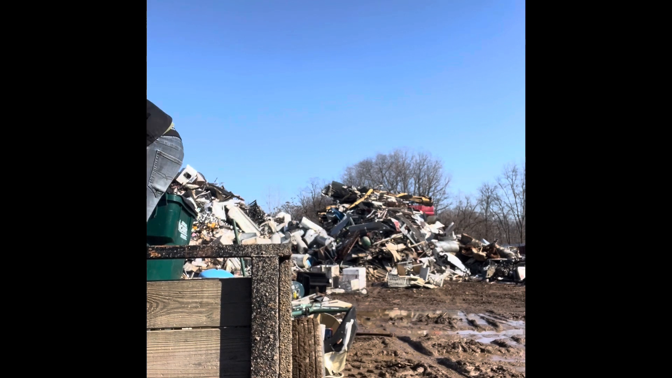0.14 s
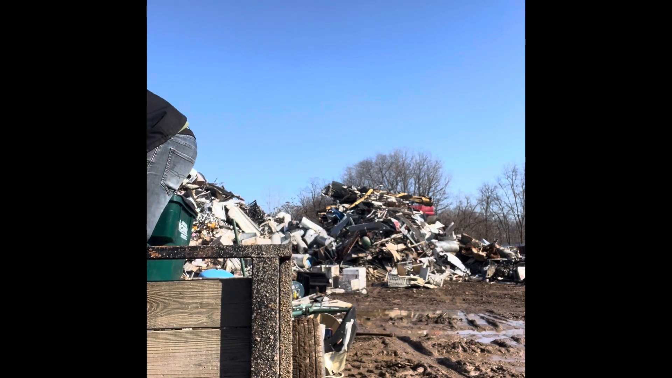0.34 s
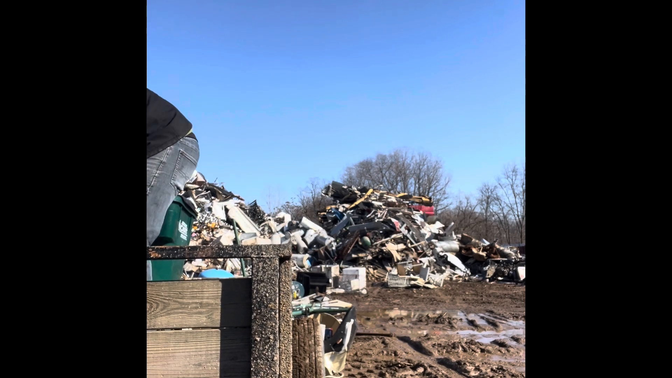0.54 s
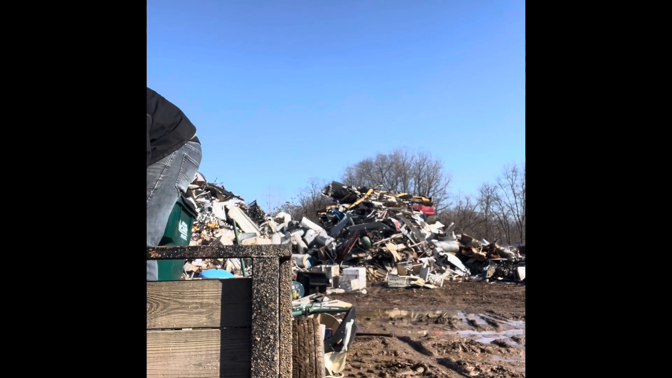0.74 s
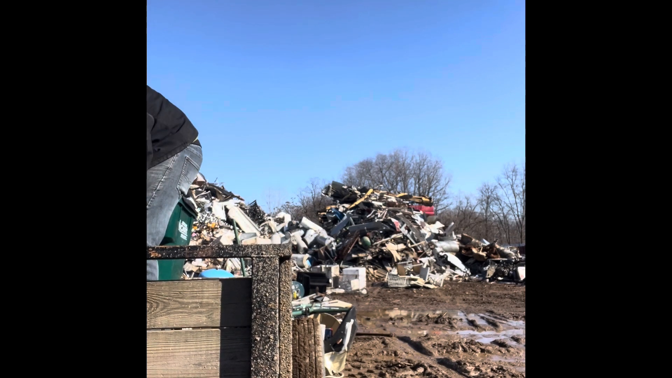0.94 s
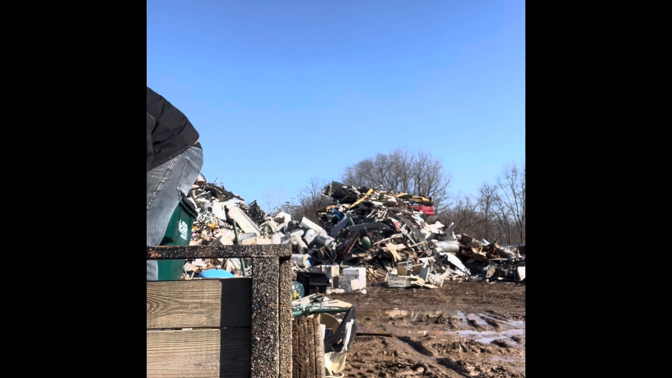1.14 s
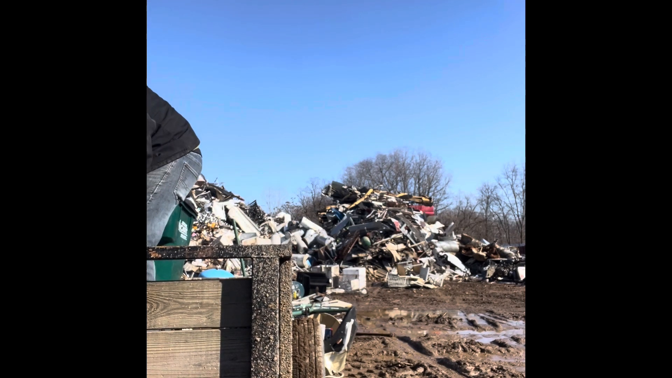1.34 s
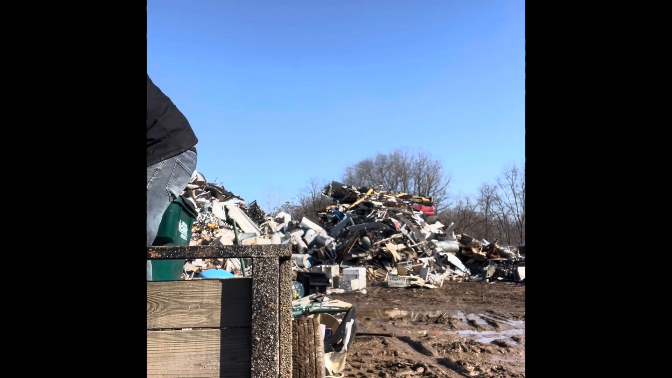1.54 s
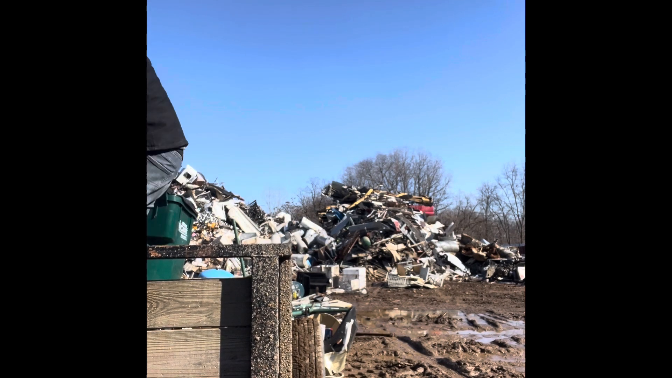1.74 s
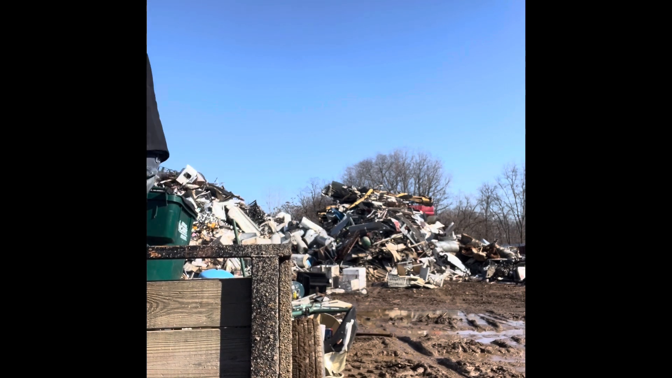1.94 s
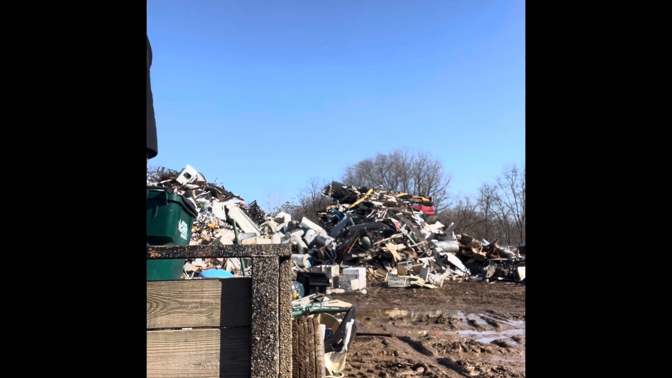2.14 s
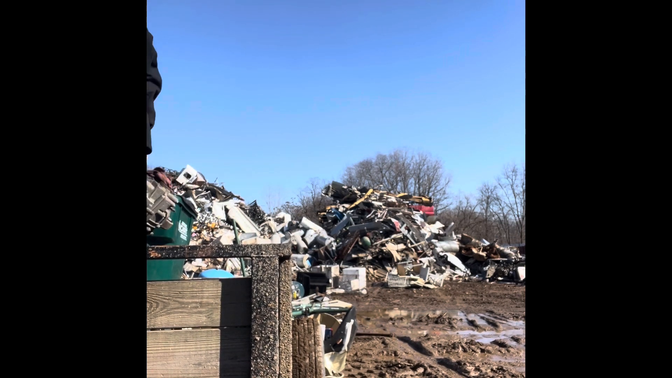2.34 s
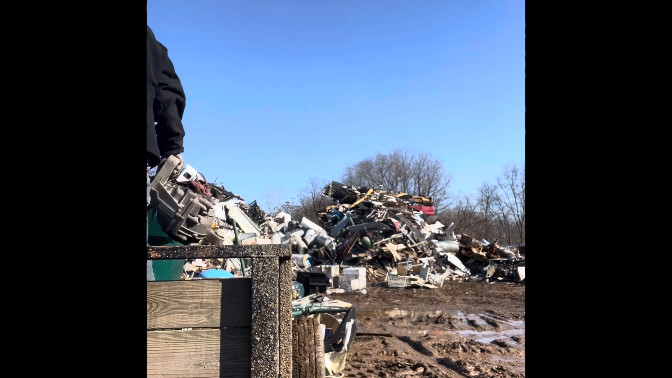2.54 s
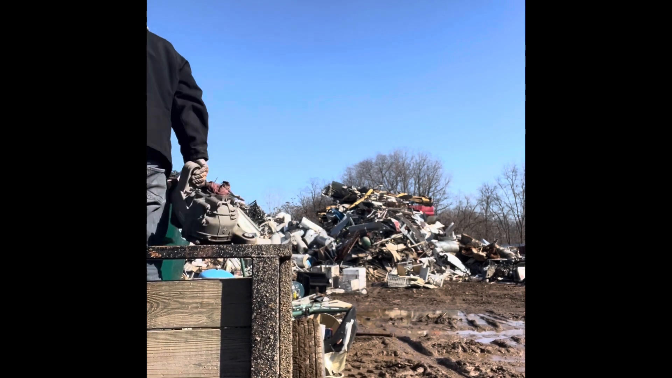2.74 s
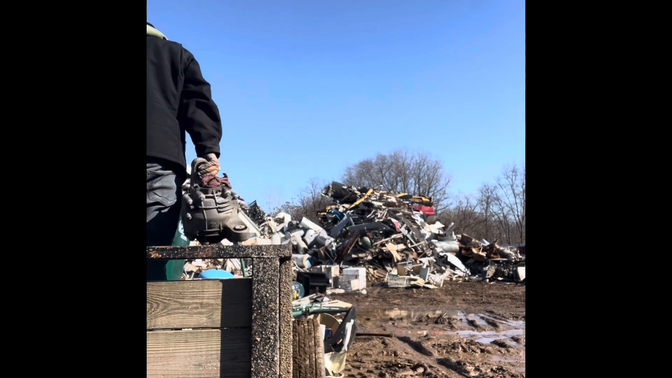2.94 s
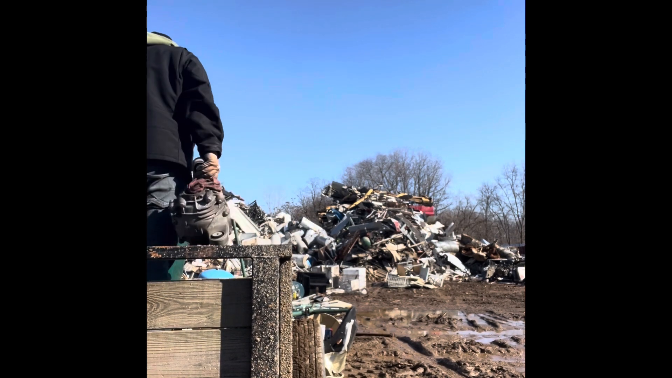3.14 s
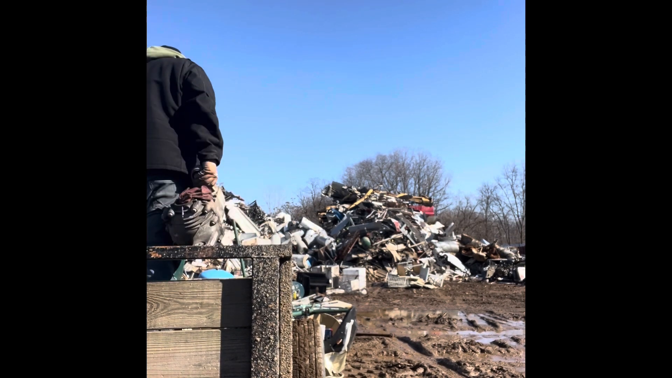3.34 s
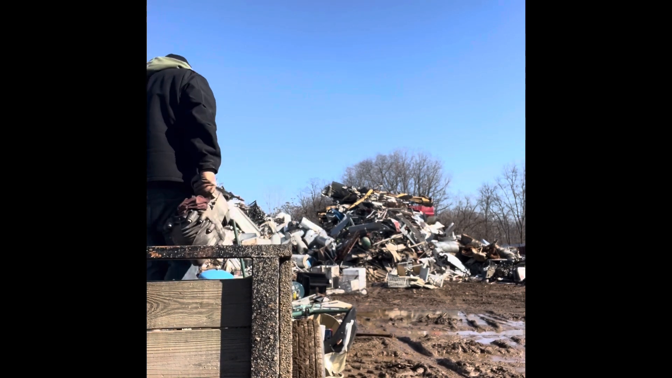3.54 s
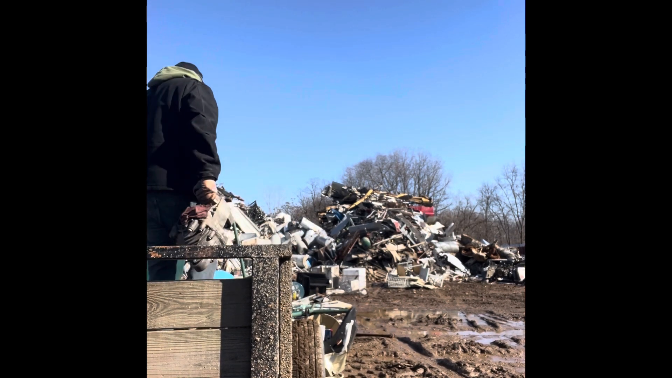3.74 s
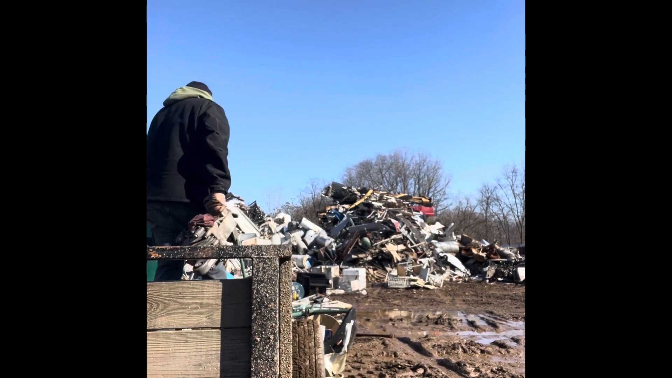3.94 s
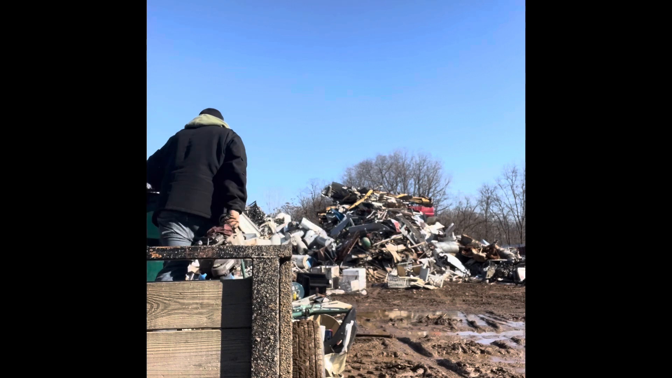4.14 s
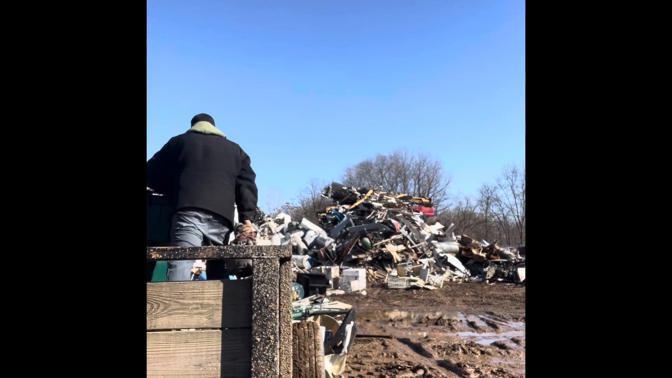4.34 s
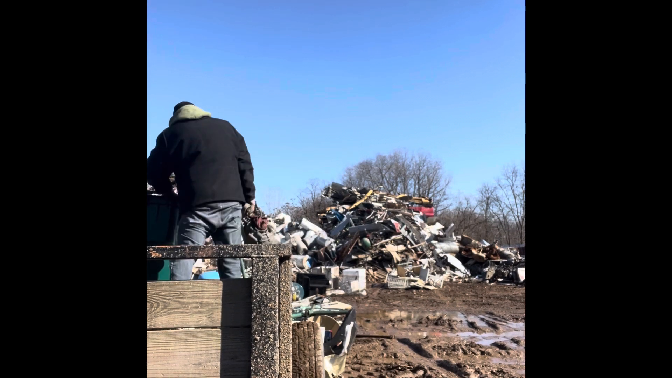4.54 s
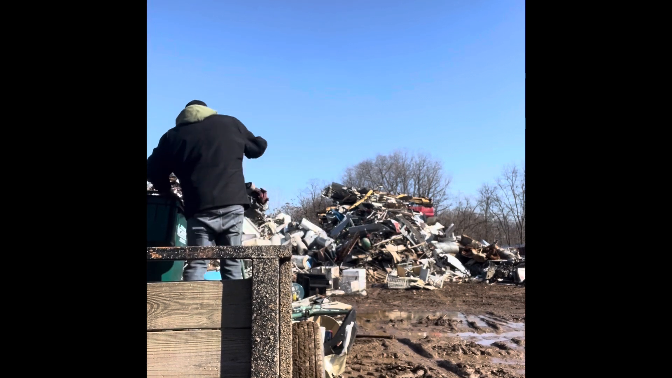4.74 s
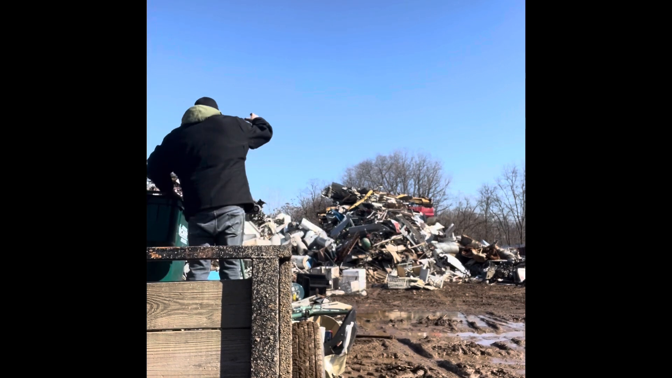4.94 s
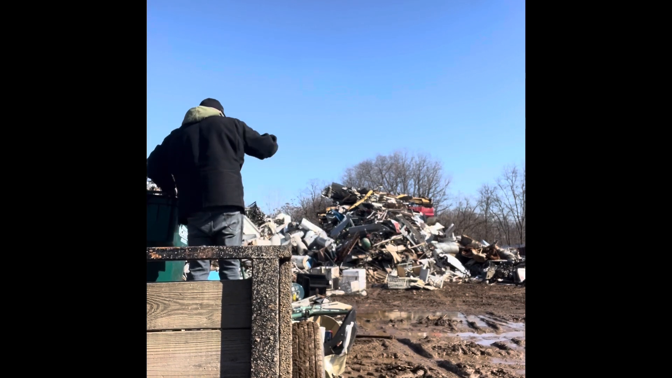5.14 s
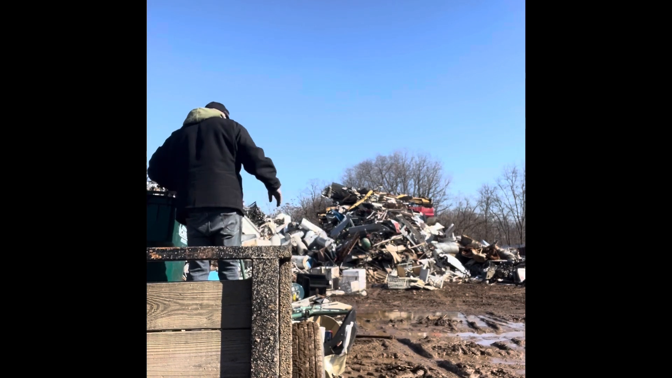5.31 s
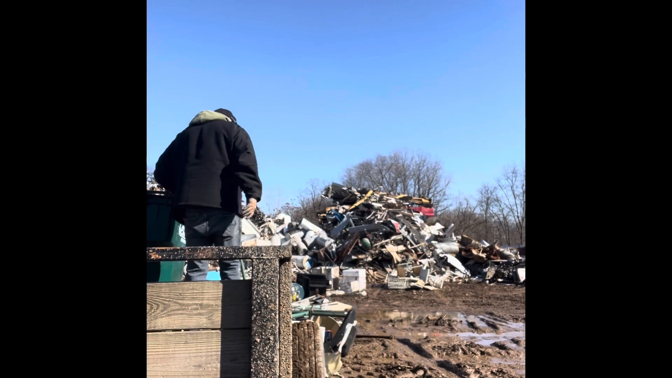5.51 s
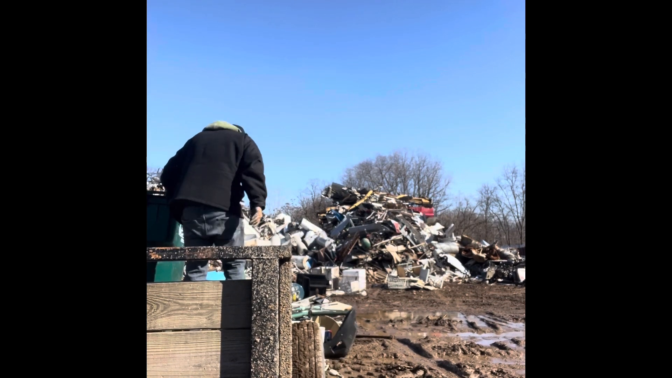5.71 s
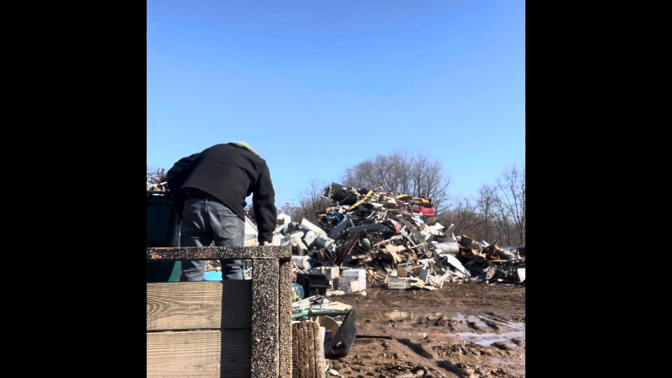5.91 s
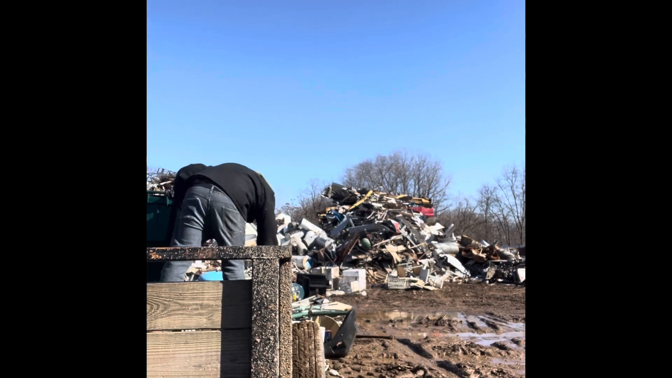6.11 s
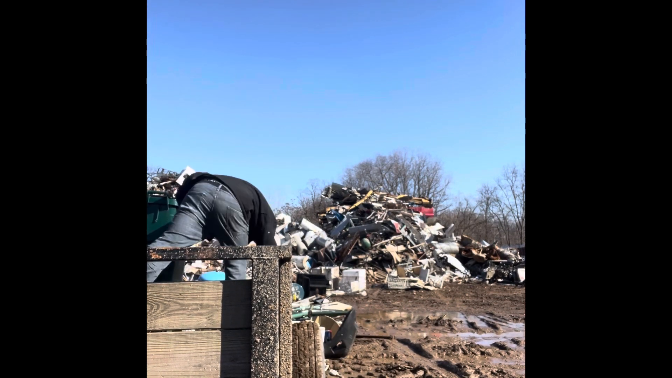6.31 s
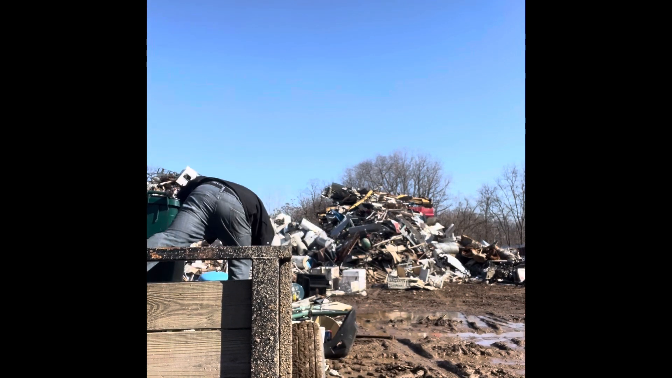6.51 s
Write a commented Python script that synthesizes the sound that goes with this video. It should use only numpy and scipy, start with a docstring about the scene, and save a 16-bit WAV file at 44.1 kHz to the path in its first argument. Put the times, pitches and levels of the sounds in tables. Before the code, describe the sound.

Quick, uneven puffs of hissing air sound over low wind rumble and faint distant machines at a scrap yard. Boots thud on a wooden-sided truck bed and a bin rings softly. A loud, sharp knock shakes the boards. Then a tossed piece of scrap crashes onto a heap of sheet metal, bouncing and sliding with a scraping clatter. A phone propped on the truck picks it all up.

```python
"""Quick, uneven puffs of hissing air are heard first, over wind rumble, far machines and a faint whine.
The place is a scrap yard, heard by a phone propped on a wooden-sided truck bed. Boots thud on the bed,
a bin rings and a loud knock cracks on the boards and sets the bed shuddering: each blow excites damped
modes. Then a tossed lump of scrap crashes, bounces and slides down a heap of sheet metal, whose
resonances are driven by dense impacts."""
import sys
import numpy as np
from scipy import signal
from scipy.fft import rfft, irfft
from scipy.io import wavfile
from scipy.ndimage import uniform_filter1d

SR = 44100
rng = np.random.default_rng(int(sys.argv[2]) if len(sys.argv) > 2 else 0)


def write(x):
    x = np.atleast_2d(x).T
    wavfile.write(sys.argv[1], SR, np.round(np.clip(x, -1, 1) * 32767).astype(np.int16))


N = 294147
T = np.arange(N) / SR
HZ = np.fft.rfftfreq(N, 1 / SR)
OPPOSITE = np.array([[1], [-1]])  # antiphase at the two microphone ports

# low rumble and buffeting: wind, plus the truck bed shuddering after the loud knock (near 4.5 s):
# (time [s], rumble level [dB], buffeting or shudder level [dB])
LOW_NOISE_LEVELS = [(0, -45, -53), (.8, -43.5, -48), (1.08, -43, -58.5), (1.4, -47, -54), (1.86, -45, -50),
                    (2.17, -47, -47.5), (2.4, -51, -57.5), (2.88, -47.5, -52.5), (3.6, -49, -60),
                    (4.12, -46.5, -55.5), (4.39, -44.5, -49.5), (4.48, -36, -34), (4.75, -45, -57.5),
                    (4.95, -41.5, -73), (5.15, -44.5, -56.5), (5.7, -41, -36), (6.2, -46.5, -39),
                    (6.42, -37.5, -39), (6.67, -37, -38.5)]
# spectra of the three parts of that low noise: (frequency [Hz], relative density [dB])
RUMBLE_SPECTRUM = [(22, -24), (35, -8.5), (50, -3.5), (75, 1), (110, -4.5), (160, -9), (250, -31)]
BUFFET_SPECTRUM = [(80, -33.5), (130, -4.5), (200, -3), (320, -2), (450, -16), (700, -67)]
RUSH_SPECTRUM = [(250, -26), (380, 3), (500, -8), (700, -5), (900, -1.5), (1200, -74)]
# far machines: (frequency [Hz], relative density [dB])
MACHINE_SPECTRUM = [(300, -14), (500, -3.5), (750, 4.5), (1050, -4), (1400, 0), (2000, -10), (2600, -2),
                    (3300, -19.5), (4500, -21.5), (7000, -32.5), (10800, -35.5), (11500, -65)]
# their rise and fall: (time [s], relative level [dB])
MACHINE_LEVELS = [(0, -50), (.9, -53.5), (1.3, -53), (1.9, -50.5), (3, -54), (3.8, -52), (4.2, -49),
                  (4.45, -43.5), (4.7, -41), (4.9, -51.5), (5.3, -49.5), (6.3, -57.5), (6.67, -49)]
# short bursts of hiss: puffs of air, and two sharp cracks on the loud knock (4.434 and 4.45 s):
# (start [s], length [s], level [dB])
HISS_BURSTS = [(.004, .044, -43), (.062, 0.017, -55), (0.152, 0.053, -51.5), (0.224, 0.054, -44),
               (0.29, 0.068, -48), (0.38, 0.048, -49.5), (0.438, .036, -58.5), (0.482, 0.046, -46.5),
               (0.548, 0.044, -42), (.615, .041, -64), (0.644, 0.074, -41.5), (0.758, 0.055, -42.5),
               (0.839, 0.058, -44.5), (0.95, 0.064, -52.5), (1.042, 0.045, -54), (1.193, .03, -57),
               (1.252, 0.024, -73), (1.305, .025, -64), (1.352, .043, -50.5), (1.422, 0.055, -52),
               (1.513, 0.06, -53), (1.604, .046, -54.5), (1.671, 0.031, -54), (1.73, 0.057, -48.5),
               (1.812, 0.063, -45), (1.911, .067, -50.5), (2.02, 0.045, -48), (2.089, .059, -47),
               (2.176, 0.045, -46.5), (2.28, 0.09, -57), (2.397, 0.057, -48.5), (2.486, 0.06, -58.5),
               (2.593, 0.053, -52), (2.666, .048, -43.5), (2.74, 0.094, -47.5), (2.88, 0.07, -42.5),
               (2.999, 0.064, -42), (3.094, 0.069, -45.5), (3.199, 0.075, -49.5), (3.325, 0.057, -48),
               (3.401, 0.037, -43), (3.458, 0.042, -52.5), (3.514, 0.043, -57), (3.582, 0.045, -59),
               (3.627, 0.046, -60), (3.694, 0.042, -53.5), (3.85, 0.066, -56.5), (3.949, 0.044, -61),
               (4.066, .036, -60), (4.133, 0.046, -45.5), (4.233, 0.059, -44), (4.324, 0.039, -44.5),
               (4.381, 0.044, -47.5), (4.434, 0.0078, -33), (4.45, 0.0082, -35.5), (4.463, 0.014, -46),
               (4.51, .024, -33.5), (4.533, 0.029, -45), (4.583, 0.037, -38.5), (4.658, 0.035, -37),
               (4.706, 0.026, -37.5), (4.771, 0.043, -37), (4.832, 0.071, -49), (4.995, .022, -57.5),
               (5.049, .027, -50.5), (5.099, .033, -60.5), (5.171, 0.032, -55.5), (5.228, 0.071, -54.5),
               (6.07, 0.1, -61), (6.199, 0.081, -62.5), (6.393, 0.056, -55), (6.479, 0.053, -47),
               (6.605, 0.18, -57.5)]
# upper and lower parts of the hiss: (frequency [Hz], relative density [dB])
HISS_TREBLE_SPECTRUM = [(2000, -53), (2800, -1.5), (3600, -8), (4500, 1.5), (6000, 0.5), (7300, -7),
                        (8200, -5), (10800, -17.5), (11500, -23), (12300, -74), (13500, -21), (15800, -16)]
HISS_BODY_SPECTRUM = [(150, -11), (350, -18), (700, -2), (1050, -12), (1400, 6.5), (1750, -6), (2200, -13),
                      (2800, -21), (3600, -24)]
# blows on the bed: (time [s], peak [dB], pitch [Hz], contact [s], pan left [dB], hardness [dB/octave])
BED_BLOWS = [(0.546, -31.5, 115, 0.016, -3, 0.5), (0.815, -22, 237, 0.01, -1, 3),
             (1.335, -32.5, 125, 0.011, 3, -2), (2.694, -45, 150, 0.014, 0, -9),
             (4.299, -28, 90, 0.012, -3, -3.5), (4.42, -4.5, 254, 0.019, 4.5, 2.2),
             (4.432, -2, 258, 0.01, 1, 6.5), (4.448, -17, 221, 0.017, -2.5, -2.5),
             (4.616, -27.5, 164, 0.031, 4, 3.5), (4.938, -28.5, 122, 0.015, 5.5, -15),
             (5.113, -32, 199, 0.015, 3.5, -17)]
# modes of a board: (frequency / pitch [ratio], level [dB], T60 [s])
BOARD_MODES = [(.58, -16, 0.13), (0.999, 4.5, 0.034), (1.5, -5, 0.056), (1.83, 0, 0.031), (2.2, -5, 0.038),
               (2.6, -18.5, 0.065), (3.78, -15.5, 0.046)]
# modes of the bin and of a small piece of scrap: (frequency [Hz], level [dB], T60 [s])
BIN_MODES = [(267.9, 0.5, 0.48), (258.5, -1.5, 0.19), (294.4, -2, 0.14), (189, -12, 0.25)]
PIECE_MODES = [(667, 5.5, 0.028), (842, 6, 0.021), (1176, -0.5, 0.019), (1520, -22, 0.011),
               (1850, -0.5, 0.015), (2312, 2, 0.036), (2640, -6, 0.033), (3530, -2, 0.011), (4530, 0, .008),
               (6000, -5, .007), (7700, -11, 0.0052)]
# small pieces scraping: (time [s], peak [dB], pan left [dB], grit decay [s], excitation centre [Hz])
SCRAP_TICKS = [(.227, -36.5, 11, 0.0066, 900), (.45, -41, 0, 0.036, 2400), (.704, -28, 0, 0.0073, 1040),
               (.774, -48, 1, 0.0092, 800), (1.95, -39.5, -1, 0.042, 2300), (2.527, -25, -1, 0.0027, 1280),
               (2.564, -33, -2, 0.0042, 2600), (4.031, -34, 1, 0.011, 2230), (4.047, -29, 0.5, 0.017, 1720),
               (4.437, -24.5, -5, 0.0043, 3820), (4.454, -30, 15, 0.0037, 1300),
               (4.513, -25.5, 6, .008, 1130), (4.68, -40.5, 10, 0.0048, 1290),
               (4.781, -32.5, 8, 0.036, 900), (5.341, -2.5, -1.5, 0.0014, 1080),
               (5.373, -26, -1, 0.0035, 700), (5.73, -25, -4, 0.012, 1970)]
# broad response of the heap: (frequency [Hz], gain [dB])
HEAP_SPECTRUM = [(90, -11.5), (200, 6), (600, -2.5), (1200, -4), (1600, -5), (2300, 1.5), (3200, -13),
                 (4500, -18.5), (6000, -23), (8000, -29), (10800, -35), (11500, -44), (13500, -48),
                 (15800, -70)]
# resonances of its sheets: (frequency [Hz], bandwidth [Hz], gain [dB])
SHEET_RESONANCES = [(235, 40, -26), (399.5, 21, 2), (557, 30, -2.5), (651, 9.9, 13), (697, 14, 3),
                    (747, 25, 2.5), (886, 38, -4.5), (1140, 29, 6.5), (1258, 34, 7.5), (1620, 34, 5.5),
                    (1906, 24, 0.5), (2016, 32, -2.5), (2080, 22, -22), (2320, 69, -1), (2270, 18, -7),
                    (2480, 28, -11), (2606, 5.5, 11.5), (2510, 11, 5), (2745, 17, 2.5), (3140, 17, -3),
                    (4750, 30, 5), (5710, 160, 5.5), (6170, 37, 9)]
# impacts and slides: (start [s], rise [s], base level [dB], treble offset [dB], bass offset [dB])
FALLS = [(5.29, 0.024, -58.5, -8, 20), (5.312, 0.019, -24, -3.5, -4.5), (5.329, 0.04, -18.5, -11.5, 0.5),
         (5.498, 0.05, -25, -12, -2), (5.64, 0.064, -36, -14, 7.5), (5.727, .006, -24, -10, -16),
         (5.779, 0.043, -26, -18.5, -1), (5.869, 0.042, -31.5, -18, 1.5), (6.054, 0.01, -44, -12, 8),
         (6.19, 0.029, -47, -21, 1)]
# right port relative to left, for sound from nearby and from the heap:
# (frequency [Hz], phase lead [rad], coherence [0-1], gain [dB])
NEAR_PORTS = [(0, -1.5, 1, -4), (288, 0.34, 0.88, 1), (556, 2.5, 0.02, -5), (840, 3, 0.76, 0),
              (1247, 3, 0.97, 1), (1586, 4, 0.93, 0.5), (2040, 3.5, 0.6, -0.5), (2710, 6, 0.1, -0.5),
              (3430, 7, 0.55, 7), (3490, 7.5, 0.4, -2.5), (4020, 6, 0.93, 0.5), (6320, 7, 1, 0.5),
              (9020, 4, 1, -1), (11000, 4, 0.8, 0), (12000, np.pi, 1, 0)]
HEAP_PORTS = [(0, 0.5, 1, 8.5), (250, 0.84, 0.49, 1.5), (583, 1.68, 0.84, -2), (914, 2.5, 1, -1),
              (1150, 2.92, .995, 0), (1400, np.pi, 1, 0), (1500, np.pi, 1, 0), (1930, 4.5, 0.93, 0),
              (2250, 6.5, 0.53, -4.5), (2960, 6.5, 0.88, 2.5), (3500, 7, 0.56, -2.5), (4570, 7.5, 0.22, 0),
              (5520, 6, 0.87, -0.5), (6940, 8, .98, 0), (8800, 5.5, 0.4, 0.5), (10800, 4, .8, 0),
              (11600, np.pi, 1, 0)]
# edge below which both channels carry the same bass: (time [s], frequency [Hz])
SHARED_BASS_EDGE = [(0, 160), (2.0, 238), (3.0, 238), (4.0, 91.5), (4.1, 25), (6.42, 25), (6.5, 226),
                    (6.67, 535)]


def undb(db):
    """Amplitude ratio of a level in decibels."""
    return 10 ** (np.asarray(db) / 20)


def unit(x):
    """Normalisation to rms 1."""
    return x / np.sqrt(np.mean(x ** 2))


def colour(x, spectrum):
    """Spectral shaping: x filtered by (frequency [Hz], gain [dB]) points, at rms 1."""
    hz, db = np.transpose(spectrum)
    gain = undb(np.interp(np.log(HZ + 1), np.log(hz), db, -120, -120))
    return unit(irfft(rfft(x) * gain, N))


def butter(order, hz, kind):
    """Maximally flat filter, as second-order sections."""
    return signal.butter(order, hz, kind, fs=SR, output="sos")


def curves(table):
    """Linear interpolation of a time table's columns at every sample."""
    times, *columns = np.transpose(table)
    return [np.interp(T, times, column) for column in columns]


def waver(rate_hz):
    """Random modulation: held values smoothed twice, with a spread near 1."""
    hold = int(SR / rate_hz)
    steps = np.repeat(rng.standard_normal(N // hold + 1), hold)
    return 1.45 * uniform_filter1d(uniform_filter1d(steps, hold), hold)[:N]


def noise():
    """Two uncorrelated white noises: what the ports share, and what they do not."""
    return rng.standard_normal((2, N))


def ports(pair, response):
    """Partial coherence: the right port hears row 0 blended with row 1 and shifted in phase."""
    hz, lead, coherence, db = np.transpose(response)
    coherence = np.interp(HZ, hz, coherence)
    shared, own = rfft(pair)
    blend = coherence * shared + np.sqrt(1 - coherence ** 2) * own
    transfer = undb(np.interp(HZ, hz, db)) * np.exp(1j * np.interp(HZ, hz, lead))
    return irfft(blend * transfer, N)


def wind_and_shudder(antiphase_db=-11.5, usual_buffet_db=-50):
    """Modulated low noise from wind and the shuddering bed: rumble with a higher rush, and buffeting."""
    rumble_db, buffet_db = curves(LOW_NOISE_LEVELS)
    common, unlike = colour(noise(), RUMBLE_SPECTRUM)
    rumble = undb(rumble_db + 2.57 * waver(15)) * (common + undb(antiphase_db) * unlike * OPPOSITE)
    rush_db = -64 + 0.75 * (buffet_db - usual_buffet_db)
    rush = undb(rush_db + 5.7 * waver(14)) * colour(noise()[0], RUSH_SPECTRUM)
    buffet = undb(buffet_db + 2.8 * waver(15)) * colour(noise(), BUFFET_SPECTRUM)
    return rumble + rush, buffet


def whine(pitch_hz=11184, waver_hz=7, level_db=-86):
    """Slow frequency modulation makes a thin tone waver."""
    phase = 2 * np.pi * np.cumsum(pitch_hz + waver_hz * waver(3)) / SR
    return undb(level_db) * np.sin(phase) * OPPOSITE


def far_machines():
    """Incoherent sources merge into a wash whose bass, middle and top waver independently."""
    wash = colour(noise(), MACHINE_SPECTRUM)
    low = signal.sosfiltfilt(butter(3, 1000, "low"), wash)
    high = signal.sosfiltfilt(butter(3, 2000, "high"), wash)
    wavering = sum(undb(1.7 * waver(25)) * band for band in (low, high, wash - low - high))
    return undb(curves(MACHINE_LEVELS)[0] + 1.5) * wavering


def hiss_bursts(rise_power=3.06, fall_power=2.9, sag_db=1.0, flicker_db=2.0, grain_db=1.0):
    """Amplitude-modulated noise: fluttering, sagging puffs of air and the knock's two sharp cracks."""
    power = 0
    for start, length, db in HISS_BURSTS:
        place = np.clip((T - start - length / 2) / (length / 2), -4, 4)  # -1 at the start, 1 at the end
        window = np.exp(-np.abs(place) ** np.where(place < 0, rise_power, fall_power))
        power = power + (undb(db - sag_db * place) * window) ** 2
    treble = np.sqrt(power) * undb(flicker_db * waver(90) + grain_db * waver(700))
    # the lower part of the hiss swells less and more slowly than the treble
    smooth_power = np.abs(uniform_filter1d(treble ** 2, int(0.0065 * SR)))
    body = (smooth_power / undb(-46) ** 2) ** 0.3 * undb(-41.8 + 3.1 * waver(24.7))
    return treble * colour(noise(), HISS_TREBLE_SPECTRUM) + body * colour(noise(), HISS_BODY_SPECTRUM)


def strike(at_s, peak_db, modes, contact_s, pan_db=0, grit_s=0):
    """Modal superposition: modes swell during contact, then decay. Axes are (port, row, sample)."""
    hz, mode_db, t60 = np.transpose(modes)[:, :, None]
    t = np.arange(int(.6 * SR)) / SR
    swell = np.sin(np.pi / 2 * np.clip(t / contact_s, 0, 1)) ** 2
    fade = undb(mode_db - 60 * np.clip(t - contact_s, 0, None) / t60)
    phase = 2 * np.pi * hz * t
    ring = swell * np.sum(fade * np.array([np.sin(phase), np.cos(phase)]), axis=1)  # rows in quadrature
    if grit_s:  # a scrape drives the modes with a burst of spiky noise
        spikes = rng.standard_normal((2, 2048)) ** 2 * rng.standard_normal((2, 2048))
        ring = signal.fftconvolve(ring, spikes * np.exp(-t[:2048] / grit_s), axes=1)
    ring *= undb(peak_db) / np.abs(ring).max(axis=1, keepdims=True)
    placed = np.pad(ring, ((0, 0), (int(at_s * SR), N)))[:, :N]
    return np.array([placed * undb(pan_db / 2), placed * undb(-pan_db / 2)])


def bed_blows():
    """Boots and knocks excite the damped modes of the boards; harder blows favour the upper modes."""
    out = 0
    for at_s, peak_db, pitch_hz, contact_s, pan_db, hardness in BED_BLOWS:
        modes = [(ratio * pitch_hz, db + hardness * np.log2(ratio), t60) for ratio, db, t60 in BOARD_MODES]
        out += strike(at_s, peak_db, modes, contact_s, pan_db)
    return out


def bin_ring():
    """The struck bin vibrates freely, and its closely spaced modes beat."""
    return strike(at_s=2.13, peak_db=-25, modes=BIN_MODES, contact_s=0.02)


def scrap_ticks(octave_off_db=9.0, detune=0.067):
    """Friction rings small pieces of scrap; modes far from the excitation centre are driven less."""
    out = 0
    for at_s, peak_db, pan_db, grit_s, centre_hz in SCRAP_TICKS:
        tunings = 1 + detune * rng.standard_normal(len(PIECE_MODES))
        modes = [(hz * tuning, db - octave_off_db * np.log2(hz / centre_hz) ** 2, t60)
                 for (hz, db, t60), tuning in zip(PIECE_MODES, tunings)]
        out += strike(at_s, peak_db, modes, contact_s=.0008, pan_db=pan_db, grit_s=grit_s)
    return out


def heap_envelope(peak_db, t60_s):
    """Energy summation: each fall swells to its peak and decays exponentially; the powers add."""
    start, rise = np.transpose(FALLS)[:2, :, None]
    swell = np.clip((T - start) / rise, 0, 1) ** 2
    fade = undb(peak_db[:, None] - 60 * np.clip(T - start - rise, 0, None) / t60_s)
    return np.sqrt(np.sum((swell * fade) ** 2, axis=0))


def scrap_crash(hits_per_s=2200, scatter_db=3.0, rattle_s=0.023, mid_boost_db=7, settle_db_per_s=7.5):
    """Forced vibration: dense uneven impacts, each with a short rattle, ring the sheets of the heap."""
    hits = (rng.random(N) < hits_per_s / SR) * undb(scatter_db * rng.exponential(size=N))
    rattle_power = signal.lfilter([1], [1, -np.exp(-1 / (rattle_s * SR))], hits ** 2)
    # the heap takes up energy at an even pace, however the single impacts fall
    rattle_power /= np.abs(uniform_filter1d(rattle_power, int(0.07 * SR))) + 1e-9
    force = rfft(noise() * np.sqrt(rattle_power))
    sheets = sum(undb(db) / (1 + 2j * (HZ - hz) / width) for hz, width, db in SHEET_RESONANCES)
    heap = colour(irfft(force * (1 + sheets), N), HEAP_SPECTRUM)
    bass = unit(signal.sosfilt(butter(3, 470, "low"), heap))
    body = unit(signal.sosfilt(butter(3, (470, 1650), "band"), heap))
    clatter = unit(signal.sosfilt(butter(3, (1650, 3500), "band"), heap))
    treble = unit(signal.sosfilt(butter(4, 3500, "high"), heap))
    start, _, base_db, treble_db, bass_db = np.transpose(FALLS)
    thinning_db = settle_db_per_s * (start - start[0])  # the clatter thins as the scrap settles
    return (bass * heap_envelope(base_db + bass_db, t60_s=0.56)
            + body * heap_envelope(base_db + mid_boost_db, t60_s=0.62)
            + clatter * heap_envelope(base_db + mid_boost_db - thinning_db, t60_s=0.56)
            + treble * heap_envelope(base_db + treble_db, t60_s=0.35))


def scene():
    """Superposition at two ports: nearby sound and the heap take separate paths; rumble and whine add."""
    rumble, buffet = wind_and_shudder()
    background = rumble + whine()
    near_left, near_right = hiss_bursts() + buffet + far_machines() + bed_blows() + bin_ring()
    heap_left, heap_right = scrap_crash() + scrap_ticks()
    left = near_left[0] + heap_left[0]
    right = ports(near_right, NEAR_PORTS) + ports(heap_right, HEAP_PORTS)
    return background + np.array([left, right])


def record(dry, ceiling=0.98, top_hz=15850):
    """Mid-side filtering makes the phone's bass mono; saturation rounds peaks; a low-pass cuts the top."""
    mid, side = (dry[0] + dry[1]) / 2, (dry[0] - dry[1]) / 2
    hz, times, frames = signal.stft(side, SR, nperseg=2048)
    edge_hz = np.interp(times, *np.transpose(SHARED_BASS_EDGE))
    high_pass = 1 / (1 + (edge_hz / (hz[:, None] + 1)) ** 8)
    side = signal.istft(frames * high_pass, SR, nperseg=2048)[1][:N]
    rounded = ceiling * np.tanh(np.array([mid + side, mid - side]) / ceiling)
    return signal.sosfilt(signal.ellip(8, .2, 70, top_hz, fs=SR, output="sos"), rounded)


dry = scene()
out = record(dry)
write(out)
```